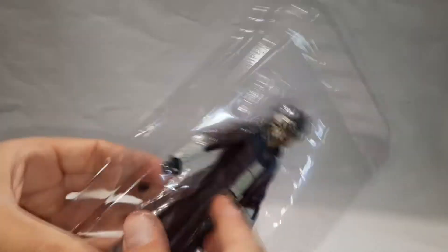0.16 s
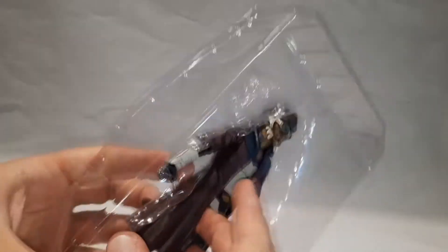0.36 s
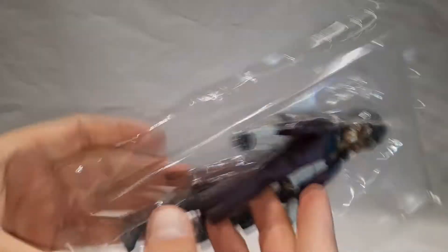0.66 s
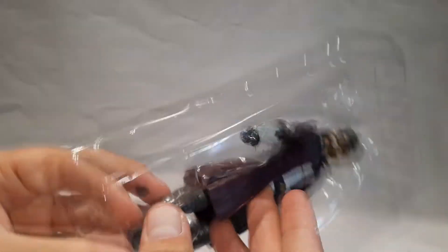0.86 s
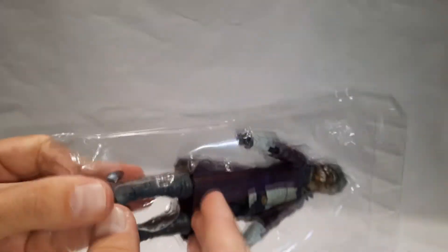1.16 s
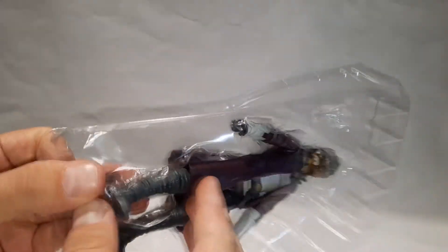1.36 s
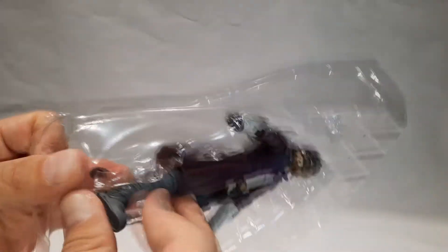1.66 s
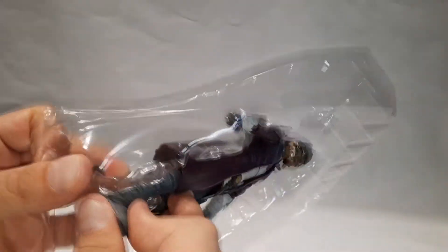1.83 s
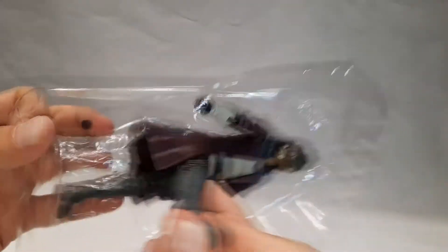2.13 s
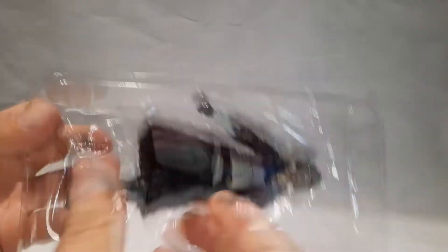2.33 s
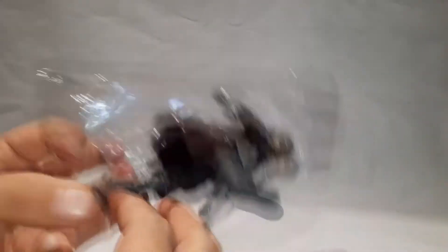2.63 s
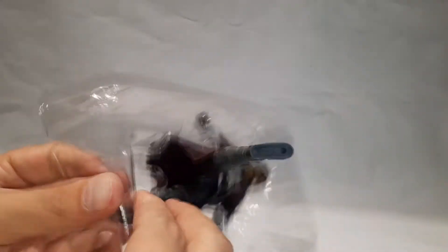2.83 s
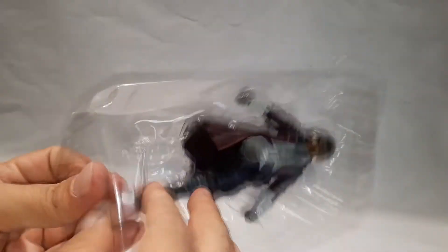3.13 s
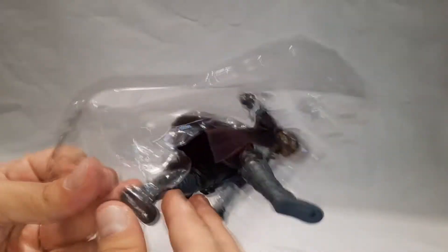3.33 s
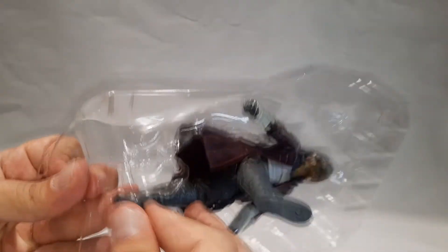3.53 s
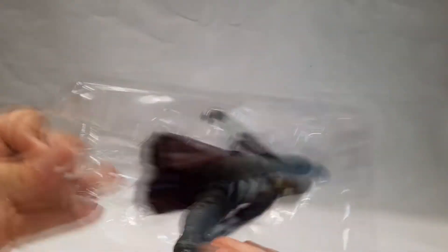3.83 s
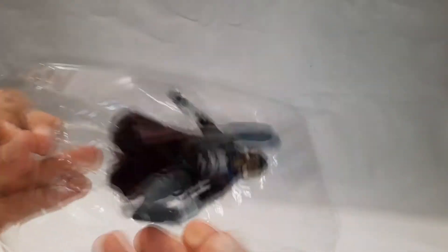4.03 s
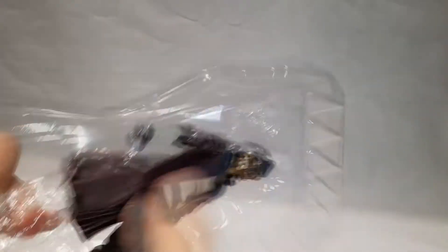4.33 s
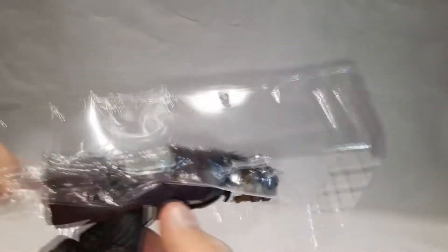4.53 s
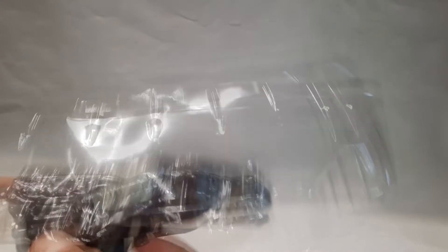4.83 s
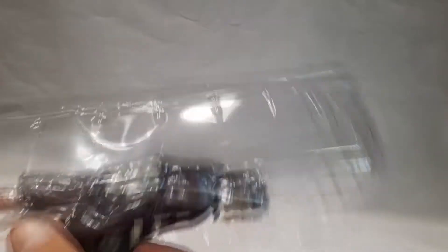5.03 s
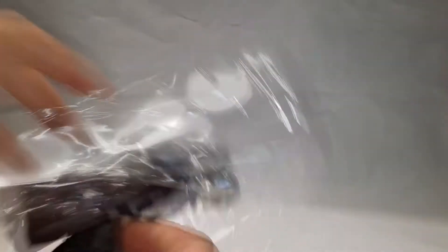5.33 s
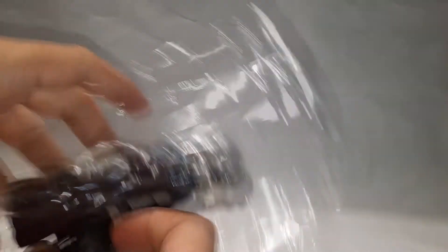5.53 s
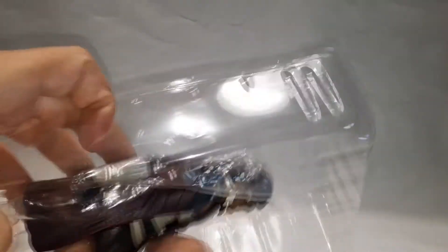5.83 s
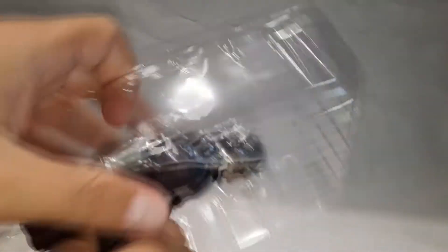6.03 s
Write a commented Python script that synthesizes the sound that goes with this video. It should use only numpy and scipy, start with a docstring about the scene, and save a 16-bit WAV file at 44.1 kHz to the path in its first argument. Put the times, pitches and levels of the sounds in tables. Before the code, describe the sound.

Thin, rigid plastic packaging crackles and pops at close range as someone pries at a toy figure. It opens with a quick run of snaps, drops to light scraping, then returns in several loud bursts separated by short lulls. The tray drums hollowly as it flexes, and fingertips slide and bump against it. The ending is lighter crinkling, with short reflections and faint air from a small room.

```python
"""In a small room, close up, two hands work a toy figure out of a clear, stiff plastic tray.
Small facets of the tray flip with sharp snaps; broad panels buckle more slowly and drum the whole shell.
Fingers and figure slide over the plastic; the rubbing swells around each snap, and tiny creases crackle.
Underneath sit dull finger thumps, short reflections and quiet room air."""
import sys
import numpy as np
from scipy import signal
from scipy.fft import rfft, irfft, next_fast_len
from scipy.io import wavfile
from scipy.ndimage import uniform_filter1d, map_coordinates

SR = 44100
rng = np.random.default_rng(int(sys.argv[2]) if len(sys.argv) > 2 else 0)


def wrap_up_sound(samples):
    """Save the sound to the file named by the first command line argument, as 16-bit audio."""
    columns = np.atleast_2d(samples).T
    # keep every value between -1 and 1, then stretch to whole-number steps
    tamed = np.clip(columns, -1, 1)
    steps = np.round(tamed * 32767).astype(np.int16)
    wavfile.write(sys.argv[1], SR, steps)


N = 272097
TIME = np.arange(N) / SR

# Small facets flipping. Each row: start in seconds, level in dB, pitch in Hz, tilt in dB per octave.
FACET_SNAPS = [(0.001, -11.5, 3010, -2.5), (0.071, -12.5, 1980, -1.5), (0.2043, -26.5, 1670, -4),
               (0.23, -29, 830, 5.5), (0.441, -24, 830, -2), (0.9666, -34.5, 1840, 0.5),
               (1.031, -42, 9700, 1.5), (1.1881, -30.5, 840, 5.5), (1.2403, -28, 2330, 2.5),
               (1.257, -17.5, 1900, 3), (1.3418, -17, 5750, 4.5), (1.351, -19.5, 3270, 1.5),
               (1.3741, -12, 1860, 0), (1.391, -17, 1900, 3), (1.4849, -15.5, 1730, -5.5),
               (1.8129, -17.5, 1700, -3), (1.9449, -10.5, 2110, 0), (1.9642, -14, 2700, 2.5),
               (2.077, -34, 4060, -1), (2.262, -17, 2300, 4), (2.304, -17, 4700, -2.5),
               (2.3706, -11.5, 2160, -4), (2.556, -38.5, 1530, -3.5), (2.6321, -36, 1450, -9),
               (2.8465, -34, 2220, -4), (3.0803, -21, 1004, 0), (3.2186, -14, 3830, -0.5),
               (3.2863, -12.5, 3770, -5), (3.3034, -21.5, 7600, -1.5), (3.5813, -27, 4300, 2),
               (3.6519, -30, 840, 2.5), (3.7865, -18, 4060, 7), (3.8189, -18, 3600, -7.5),
               (3.915, -11, 2390, -3.5), (4.1541, -37, 8030, -1), (4.2309, -18, 3780, 0.5),
               (4.2574, -13, 1700, -5), (4.6666, -39.5, 4100, 8.5), (4.7982, -35.5, 1950, -11),
               (4.8679, -33.5, 1170, -0.5), (4.9159, -30, 1400, -2), (4.9539, -26.5, 1800, -3.5),
               (5.72, -21, 1900, -1.5), (6.1176, -27, 2300, -4)]
# Broad panels buckling. Each row: start in seconds, level in dB, tilt in dB per octave,
# push on the shell in dB.
PANEL_BUCKLES = [(0.0349, -18.5, -1, -22.5), (0.059, -15, -3, -35), (0.3315, -23.5, -8.5, -24.5),
                 (0.4287, -27.5, -6.5, -27), (0.91, -38.5, -8, -33.5), (1.122, -31.5, -8.5, -32.5),
                 (1.2237, -28, 6, -29), (1.312, -26, -9, -28.5), (1.414, -12.5, -5.5, -18.5),
                 (1.4573, -19.5, -5, -33.5), (1.9225, -15, 1, -37), (2.1328, -31.5, -3, -34.5),
                 (2.2316, -22.5, -6, -34.5), (2.3574, -18.5, 0, -42), (3.1053, -18, -2, -21.5),
                 (3.158, -27, -0.5, -33.5), (3.2302, -13, 2, -18.5), (3.471, -13, -9.5, -18),
                 (3.5328, -28, 4, -33), (3.6868, -21.5, -5, -25.5), (3.7681, -19, 0.5, -34),
                 (4.4784, -10, -4, -26), (4.5156, -10, -2, -23.5), (4.531, -18, 0.5, -22),
                 (4.756, -34.5, 5, -49), (5.1655, -33, 0, -42), (5.7945, -28, -9.5, -28),
                 (6.034, -35.5, -10.5, -42.5)]
# The tone of rubbed plastic. Each row: frequency in Hz, gain in dB.
SCRAPE_EQ = [(100, -25), (400, -7), (620, -10), (840, -3), (1090, -13.5), (1500, -6), (2000, -8),
             (2700, -14.5), (3800, -13.5), (6000, -16), (9500, -20), (13000, -15.5), (16000, -16.5)]
# What is sliding. Each row: time in seconds, softness from 0 (hard figure) to 1 (fingertip).
SOFTNESS = [(0, 0.73), (0.9, 0.62), (1.25, 0.086), (1.6, 0.85), (1.9, 0.17), (2.2, .7), (2.8, 0.15),
            (3.15, .65), (3.4, 0.38), (3.85, 0.63), (4.05, 0.35), (5.0, 0.5), (5.2, 0.72), (6.17, 0.61)]


def amp(db):
    """Decibels to gain."""
    return 10 ** (np.asarray(db) / 20)


def unit(x):
    """Scales to rms 1."""
    return x / np.sqrt(np.mean(x ** 2) + 1e-20)


def read(points, hz):
    """Reads a spectrum table on a log-frequency axis."""
    f, value = np.transpose(points)
    return np.interp(np.log(hz + 1), np.log(f + 1), value)


def follow(table, column=1):
    """One column of an automation curve at every sample."""
    rows = np.array(table)
    return np.interp(TIME, rows[:, 0], rows[:, column])


def add(mix, s, sound):
    """Adds a sound to the mix at s seconds."""
    part = mix[..., max(round(s * SR), 0):][..., :sound.shape[-1]]
    part += sound[..., :part.shape[-1]]


def colour(x, eq):
    """Filters by an EQ curve."""
    size = next_fast_len(x.shape[-1] + 4096)
    gain = amp(read(eq, np.fft.rfftfreq(size, 1 / SR)))
    return irfft(rfft(x, size) * gain, size)[..., :x.shape[-1]]


def causal(db):
    """Minimum-phase response with these gains: it rings only after the hit."""
    log_gain = np.log(amp(np.r_[db, db[-2:0:-1]]))
    return np.exp(np.conj(signal.hilbert(log_gain)))[:len(db)]


def two_ears(spectra, hz):
    """A bent sheet radiates its treble differently towards each ear."""
    # Stereo likeness. Each row: frequency in Hz, correlation of the ears from 0 to 1.
    likeness = [(200, 0.91), (600, 0.88), (1200, 0.4), (3000, 0.28), (15000, 0.15)]
    same = np.clip(read(likeness, hz), 0, 1)
    return np.array([spectra[0], same * spectra[0] + np.sqrt(1 - same ** 2) * spectra[1]])


def placed(x):
    """The tray sits left of centre: the right ear hears it softer and mostly later."""
    # Where it is held. Each row: time in seconds, left ear's lead in ms, left minus right in dB.
    position = [(0, 0.15, 2), (2.0, 0.2, 1.5), (3.2, 0.13, 2.4), (3.8, -0.039, 0.7), (4.2, 0.237, 3.5),
                (6.17, 0.26, 3)]
    delayed = np.arange(N) - follow(position, 1) * SR / 1000
    lean = amp(follow(position, 2) / 2)
    return np.array([x[0] * lean, map_coordinates(x[1], [delayed], order=5) / lean])


def room_air():
    """A steady, dark bed of room tone."""
    # The tone of the air. Each row: frequency in Hz, gain in dB.
    air_eq = [(25, -1.5), (120, -33), (200, -21), (300, 2), (630, -29.5), (1300, -11), (2800, -53),
              (15000, -60)]
    return unit(colour(rng.standard_normal((2, N)), air_eq))


def reflections(x, gap_s=0.0011, size=20000):
    """Dense reflections from table and walls, each band dying at its own speed."""
    # The room's decay. Each row: frequency in Hz, time to fall 60 dB in seconds.
    room_t60 = [(200, 0.52), (530, 0.16), (3700, 0.2), (14000, 0.15)]
    hz, t, bands = signal.stft(rng.standard_normal((2, size)), SR, nperseg=256)
    bands = two_ears(bands.transpose(0, 2, 1), hz).transpose(0, 2, 1)
    decay = amp(-60 * t / read(room_t60, hz)[:, None])
    tail = signal.istft(bands * decay, SR, nperseg=256)[1]
    tail *= np.clip(np.arange(tail.shape[1]) / SR / gap_s - 1, 0, 1)
    return signal.fftconvolve(x, tail / np.linalg.norm(tail[0]), axes=1)[:, :N]


def effort_db(strain_db=-25, build_s=0.015, ease_s=0.04):
    """Strength of the rubbing: the sliding hands plus the strain around each snap and buckle."""
    # How hard the hands slide. Each row: time in seconds, level in dB.
    sliding = [(0, -49.5), (0.35, -39.5), (0.48, -55), (0.54, -43), (0.79, -40), (0.84, -51), (1.09, -61),
               (1.2, -43), (1.56, -47), (1.78, -57), (1.86, -39), (2.07, -61.5), (2.2, -39), (2.43, -35),
               (2.49, -69.5), (2.69, -63.5), (2.79, -41.5), (2.88, -64), (3.03, -50), (3.08, -36),
               (3.44, -47), (3.7, -53.5), (3.79, -32), (4.07, -41), (4.12, -79.5), (4.32, -38.5),
               (4.42, -61.5), (4.46, -30.5), (4.66, -66.5), (4.88, -64), (4.96, -52.5), (5.24, -60),
               (5.38, -83.5), (5.41, -55.5), (5.49, -40.5), (5.63, -59), (5.8, -39), (6.03, -52.5),
               (6.17, -37.5)]
    t = np.arange(-SR // 8, SR // 3) / SR
    swell = np.exp(np.minimum(t / build_s, -t / ease_s))
    strain_power = np.zeros(N)
    for s, db, *_ in FACET_SNAPS + PANEL_BUCKLES:
        add(strain_power, s + t[0], (amp(db + strain_db) * swell[t >= -s]) ** 2)
    return 10 * np.log10(amp(follow(sliding)) ** 2 + strain_power)


def pressure_db(hard_db=-11, flesh_db=14, rest_db=-62):
    """How hard the rubbing flexes the tray: a soft fingertip grips and bends it most."""
    bend_db = effort_db() + hard_db + flesh_db * follow(SOFTNESS)
    return 20 * np.log10(amp(bend_db) + amp(rest_db))


def fingers(grip_db=-60, width=0.35):
    """Soft flesh bumps the tray: a low rumble that follows the flexing, and a few dull thumps."""
    # Finger thumps. Each row: time in seconds, level in dB, length in seconds.
    thumps = [(1.422, -36.5, 0.06), (1.627, -62.5, 1), (3.227, -45.5, 0.066), (3.776, -33, 0.017),
              (3.924, -55.5, 0.05), (5.89, -48, 0.089)]
    # Their bassy tone. Each row: frequency in Hz, gain in dB.
    thump_eq = [(20, -28), (50, -8), (85, -3.5), (130, -2), (200, -8.5), (600, -56.5), (2000, -70)]
    flex_db = pressure_db()
    level = amp(grip_db + flex_db - flex_db.mean())
    for s, db, length in thumps:
        age = np.arange(SR // 2) / SR / (length / 4)  # 1 at the peak
        add(level, s - length / 8, amp(db) * age * np.exp(1 - age))
    centre, left, right = colour(rng.standard_normal((3, N)), thump_eq)
    return unit(centre + width * np.array([left, right])) * level


def shell_ring(grip_detune=0.023, uneven_db=4, rise_s=0.0022, size=13000):
    """One blow on the tray; the grip detunes its modes, and the spot struck weights them."""
    # Modes of the whole tray. Each row: frequency in Hz, level in dB, time to fall 60 dB in seconds.
    modes = [(158.4, -12.5, 0.094), (188.7, -20.5, 0.24), (260, -12, 0.24), (290, -6.5, 0.25),
             (315, 2, 0.089), (353.3, -0.5, 0.14), (402.6, -8.5, 0.16), (445, -5, 0.081), (511, -7, 0.11),
             (551, -11, 0.087)]
    t = np.arange(size) / SR
    hz, db, t60 = np.transpose(modes)[:, :, None]
    detune, strength, side = rng.standard_normal((3, len(modes), 1))
    weight = amp(db + uneven_db * strength - 60 * t / t60) * np.sign(side)
    partials = weight * np.sin(2 * np.pi * hz * (1 + grip_detune * detune) * t)
    ring = partials.sum(0) * (1 - np.exp(-t / rise_s))
    return ring / np.sqrt(np.sum(ring ** 2) / (SR // 40))  # every ring carries the same energy


def slips(per_s, spread_db):
    """Sparse stick-slip impulses of uneven strength."""
    kicks = amp(spread_db * np.minimum(rng.exponential(1, N), 4)) * rng.choice([-1, 1], N)
    return unit(kicks * (rng.random(N) < per_s / SR))


def flexing(grips=6, shift_s=0.25):
    """Rubbing keeps the low modes murmuring; as the grip shifts, so does their tuning."""
    murmur = np.zeros(N)
    for k in range(grips):
        crossfade = np.maximum(np.cos(2 * np.pi * (TIME / shift_s - k) / grips), 0) ** 4
        ring = shell_ring()
        murmur += signal.oaconvolve(crossfade * slips(per_s=150, spread_db=-0.5), ring)[:N]
    return unit(murmur) * amp(pressure_db())


def crackle(per_s=520, spread_db=3.0, t60=0.016, spot_db=7, spot_octaves=0.25, spots=14, size=1024):
    """Slips at many spots of the sheet, each spot with its own pitch and short ring."""
    t, hz = np.arange(size) / SR, np.fft.rfftfreq(size, 1 / SR)
    out = np.zeros((2, N))
    for pitch in np.geomspace(800, 13000, spots):
        waves = rng.standard_normal((2, size)) * amp(-60 * t / t60)
        resonance_db = spot_db * (2 / (1 + (np.log2((hz + 1) / pitch) / spot_octaves) ** 2) - 1)
        ring = irfft(two_ears(rfft(waves), hz) * causal(read(SCRAPE_EQ, hz) + resonance_db))
        out += signal.oaconvolve(slips(per_s / spots, spread_db)[None], ring, axes=1)[:, :N]
    return unit(out)


def scraping(hiss_db=-3, catch_db=4.5, muffle_db=-20):
    """Dense stick-slip over a fine hiss, duller under a fingertip, catching and letting go."""
    rub = crackle() + amp(hiss_db) * unit(colour(rng.standard_normal((2, N)), SCRAPE_EQ))
    catching = unit(uniform_filter1d(uniform_filter1d(rng.standard_normal(N), size=600), size=200))
    muffled = colour(rub, [(1000, 0.011), (16000, muffle_db)])
    softness = follow(SOFTNESS)
    texture = softness * unit(muffled) + (1 - softness) * unit(rub)
    return texture * amp(effort_db() + catch_db * catching)


def snap(pitch, tilt, t60, size=8192):
    """The plastic flips: a ragged burst of bending waves, coloured by its pitch, dies in the sheet."""
    # The sheet's tone before tilt and pitch. Each row: frequency in Hz, gain in dB.
    sheet_eq = [(40, -38.5), (150, -17.5), (400, -8), (620, -8.5), (820, 3.5), (1080, 0), (1500, 0),
                (3000, -1.5), (9500, -4), (13000, -4), (16000, -15.5)]
    ragged, rise_share = 0.38, 0.0077
    ring_db, ring_t60 = -20, 0.12
    split_hz, treble_life = 4500, 0.5  # the plastic damps its treble first
    facet_db, blur_db, facet_octaves = 15, 4.0, 0.35
    t, hz = np.arange(size) / SR, np.fft.rfftfreq(size, 1 / SR)
    # The fold runs in jerks, and long crumples start more softly.
    jerks = np.exp(ragged * unit(uniform_filter1d(rng.standard_normal(size), size=40)))
    waves = rng.standard_normal((2, size)) * (1 - np.exp(-t / (rise_share * t60)))
    low = rfft(waves * (jerks * amp(-60 * t / t60) + amp(ring_db - 60 * t / ring_t60)))
    high = rfft(waves * jerks * amp(-60 * t / (t60 * treble_life)))
    low_share = 1 / (1 + (hz / split_hz) ** 2)
    spectra = two_ears(low_share * low + (1 - low_share) * high, hz)
    # A short snap is one facet, with a clearer pitch.
    purity_db = facet_db - blur_db * np.log2(1 + t60 / 0.015)
    resonance = amp(purity_db) / (1 + (np.log2((hz + 1) / pitch) / facet_octaves) ** 2)
    slope_db = tilt * np.log2(np.maximum(hz, 700) / 700)
    tone_db = read(sheet_eq, hz) + slope_db + 10 * np.log10(1 + resonance ** 2)
    burst = irfft(spectra * causal(tone_db))
    return unit(burst) * np.sqrt(SR / 200 / size)  # the energy of 5 ms at rms 1


def creases(count=110, over_db=2, spread_db=4.5, mean_t60=0.012):
    """While the rubbing strains the tray, tiny creases give way, each with its own pitch and tone."""
    out = np.zeros((2, N))
    rub_db, softness = effort_db(), follow(SOFTNESS)
    for when, smallness, height, bright, life in rng.random((count, 5)):
        at = int(when * N)
        tilt = 3 - 7 * softness[at] + 3 * (2 * bright - 1)  # dB per octave, duller under a fingertip
        crack = snap(900 * 7 ** height, tilt, mean_t60 * (0.5 + life), size=2048)
        db = rub_db[at] + over_db - spread_db * np.log(0.08 + smallness)  # mostly small, a few large
        add(out, at / SR, amp(db) * crack)
    return out


def drumming(snap_push_db=-19.5, push_per_tilt=-0.48):
    """Buckles and snaps push the whole tray into its low modes; bright snaps push less."""
    pushes = [(s, push_db) for s, _, _, push_db in PANEL_BUCKLES]
    pushes += [(s, db + snap_push_db + push_per_tilt * tilt) for s, db, _, tilt in FACET_SNAPS]
    out = np.zeros(N)
    for s, push_db in pushes:
        add(out, s, amp(push_db) * shell_ring())
    return out


def buckles(panel_hz=1760, panel_t60=0.074):
    """A fold runs across a broad panel: a longer, lower crumple."""
    out = np.zeros((2, N))
    for s, db, tilt, _ in PANEL_BUCKLES:
        add(out, s, amp(db) * snap(panel_hz, tilt, panel_t60))
    return out


def snaps(base_t60=0.041, halving_db=30, halving_octaves=2.5):
    """The facets flip one after another; a wide one is loud and low, and rings longer."""
    out = np.zeros((2, N))
    for s, db, pitch, tilt in FACET_SNAPS:
        halvings = -db / halving_db + np.log2(pitch / 2000) / halving_octaves
        add(out, s, amp(db) * snap(pitch, tilt, base_t60 * 0.5 ** halvings))
    return out


def scene(scrape_db=-2, drum_db=-2, flex_db=-2, room_db=-13, room_treble_db=-4, air_db=-66):
    """Mixes the bright sheet and the low shell with their reflections and the room air."""
    sheet = snaps() + buckles() + creases() + amp(scrape_db) * scraping()
    shell = amp(drum_db) * drumming() + amp(flex_db) * flexing() + fingers()
    tray = placed(sheet + shell)
    reverb = colour(reflections(tray), [(2000, room_db), (12000, room_db + room_treble_db)])
    return tray + reverb + amp(air_db) * room_air()


def record(dry):
    """Clips at full scale, then cuts the highs above 16.1 kHz."""
    low_pass = signal.firwin(301, 16100, window=("kaiser", 8), fs=SR)
    return signal.oaconvolve(np.clip(dry, -1, 1), low_pass[None], "same", axes=1)


dry = scene()
out = record(dry)
wrap_up_sound(out)
```